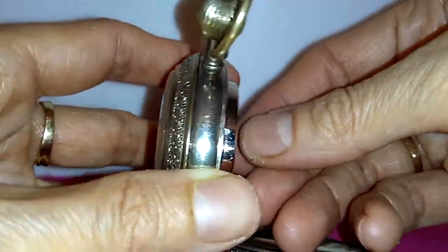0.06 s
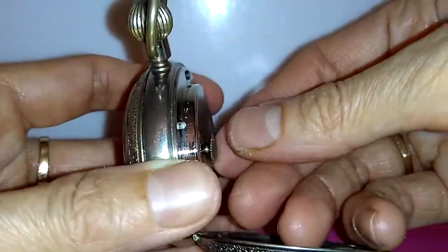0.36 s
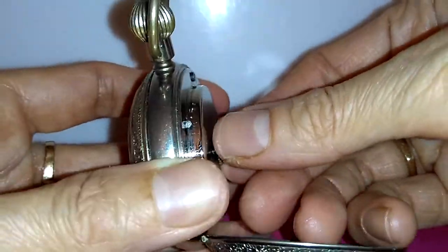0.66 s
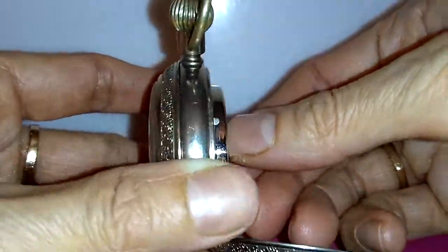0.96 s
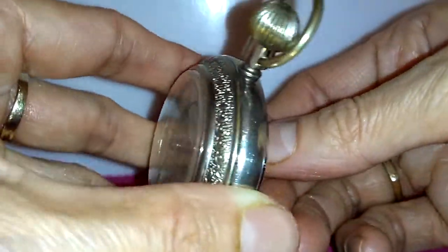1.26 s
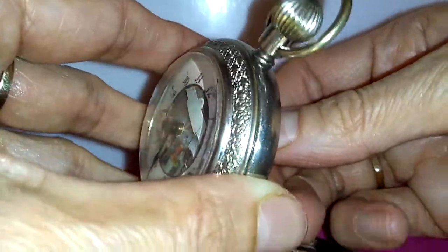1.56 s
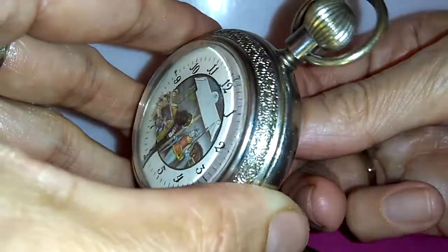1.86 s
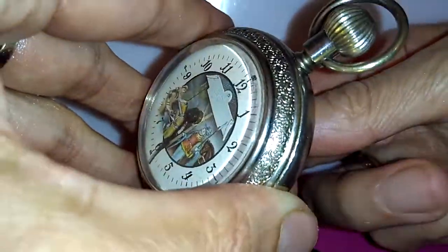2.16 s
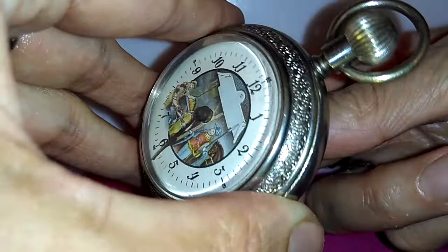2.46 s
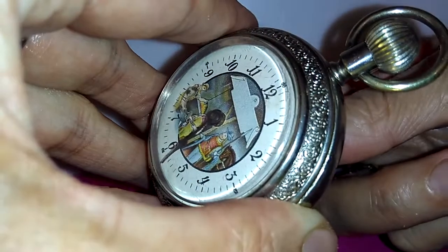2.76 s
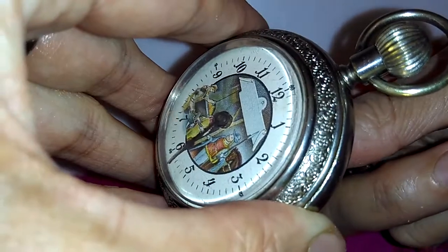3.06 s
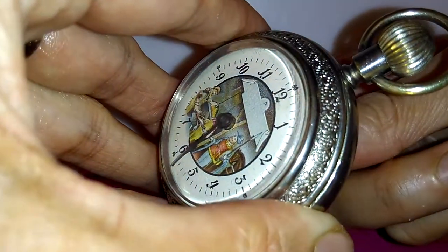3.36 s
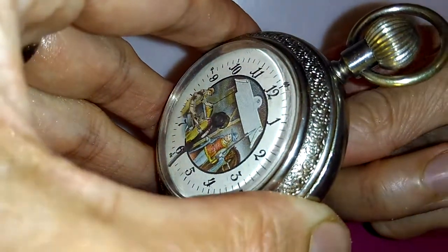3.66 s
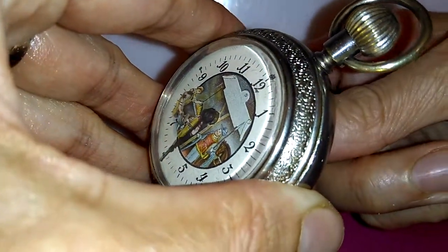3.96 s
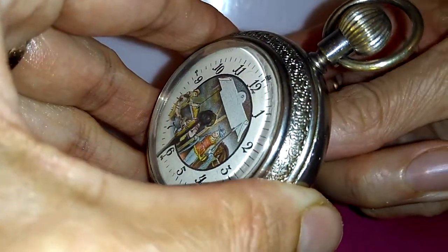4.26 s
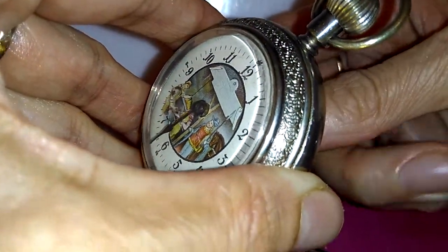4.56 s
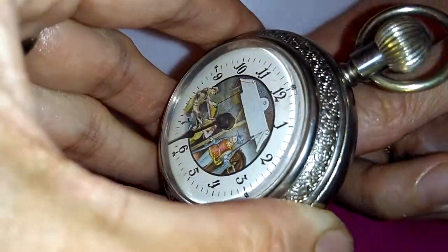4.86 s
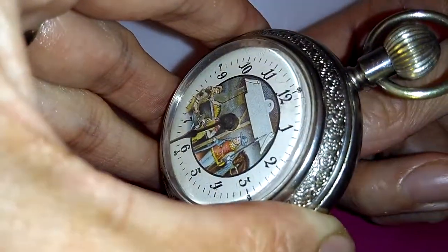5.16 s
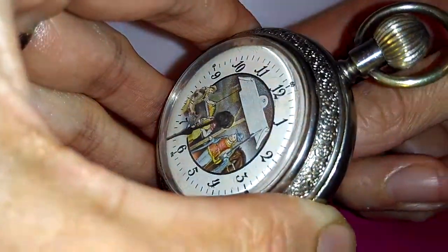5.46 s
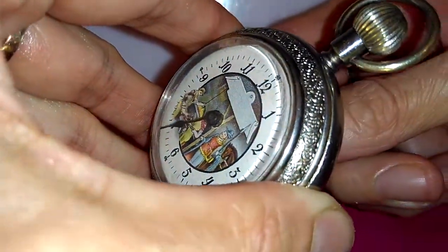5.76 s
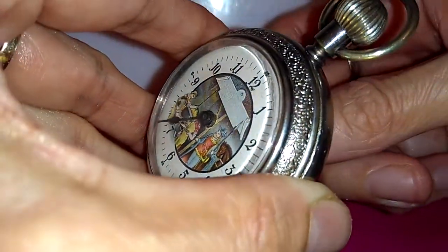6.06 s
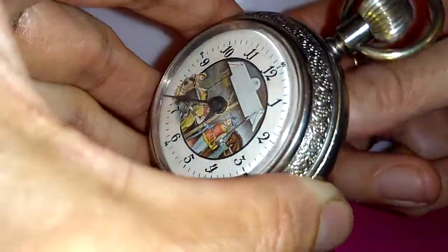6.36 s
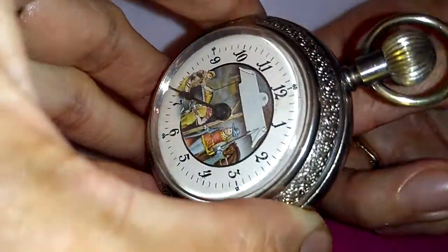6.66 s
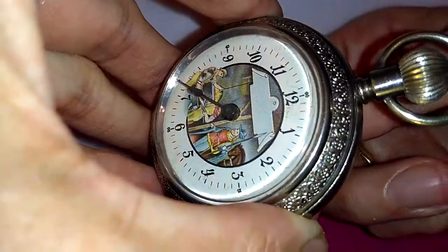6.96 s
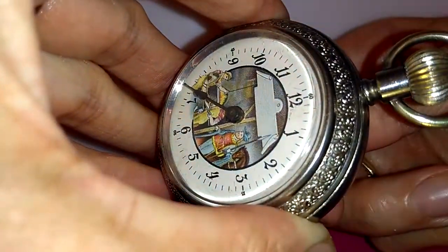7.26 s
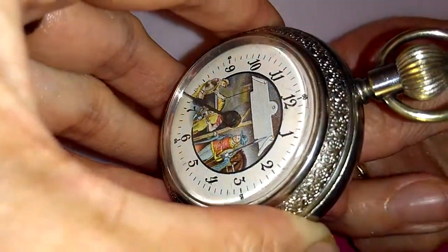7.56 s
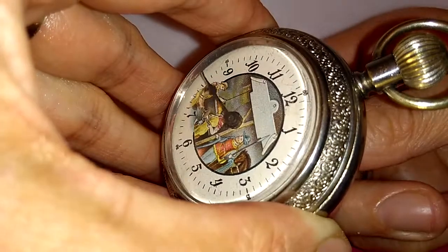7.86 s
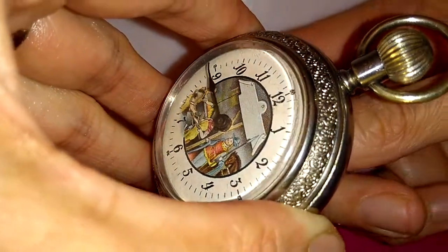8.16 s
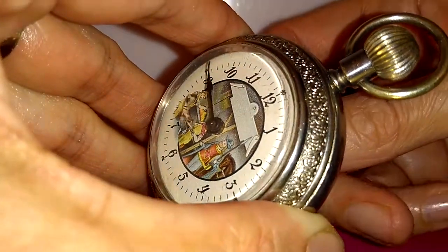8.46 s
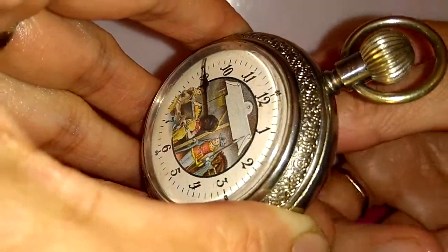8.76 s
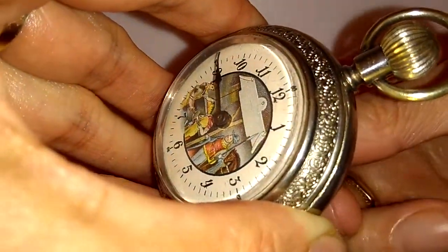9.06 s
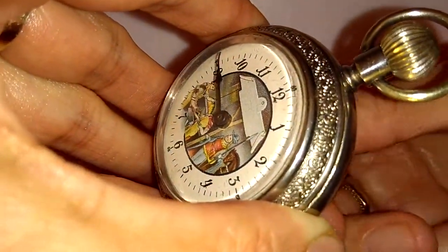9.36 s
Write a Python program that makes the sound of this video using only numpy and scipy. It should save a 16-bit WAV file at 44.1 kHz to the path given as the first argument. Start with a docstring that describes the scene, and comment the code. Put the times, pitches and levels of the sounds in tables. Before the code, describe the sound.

In a small quiet room, a pocket watch keeps up a fast, even, light ticking very near the microphone. As it is turned in the hands, fingers knock dully on the case and rub softly over it, and the metal gives a few sharp little clicks, most clearly around four seconds in. The ticking never pauses, and a steady low rumble with faint hum and hiss lies behind it.

```python
"""In a quiet small room, a pocket watch held close beats five times a second: firm tick, softer tock.
Each beat is a faint unlocking click, then a toothed wheel drops onto a catch and rattles, which
makes the works and the case ring. Fingers turn the watch with dull knocks, sharp little clicks and
a soft rub of skin. Behind it are low rumble, hum, hiss and a brief, faint whistle."""
import sys
import numpy as np
from scipy import signal
from scipy.fft import rfft, irfft, next_fast_len
from scipy.io import wavfile

SR = 44100
rng = np.random.default_rng(int(sys.argv[2]) if len(sys.argv) > 2 else 0)


def digitize_waveform(pressure):
    """Quantize a signal to 16-bit integers and store it at the path in sys.argv[1].

    Rows of a 2-D input are taken as channels; values are limited to [-1, 1].
    """
    field = np.atleast_2d(pressure).T
    bounded = np.clip(field, -1, 1)
    quanta = np.round(bounded * 32767).astype(np.int16)
    wavfile.write(sys.argv[1], SR, quanta)


N = 415414
SHORT = SR // 10  # samples in which one contact dies away
TIME, AGE = np.arange(N) / SR, np.arange(SHORT) / SR  # seconds into the scene, and into one contact

# The notes (modes) each part rings with; a narrow one rings longer: (pitch [Hz], width [Hz], level [dB])
CASE_MODES = [(1170, 220, -7), (1340, 105, 8)]
PLATE_MODES = [(1902, 350, -8.5), (2690, 81, 13), (3532, 400, 6.5), (4526, 314, 3), (5440, 326, 5.5),
               (6620, 230, 3), (7030, 300, 0), (7930, 520, -1.5)]  # the plates that hold the wheels
SPRING_MODES = [(5650, 280, 2.5), (6112, 113, 6.7)]
STEEL_MODES = [(8170, 1350, -7.5), (9640, 1330, -4), (11020, 880, -7), (11550, 110, -1), (12270, 670, 1),
               (13400, 1300, -3), (14680, 1200, -2)]  # the small steel parts
AFTERRING_MODES = [(3725, 18, -6), (8899, 18, -7), (9197, 18, -4), (11400, 35, -14), (11623, 35, -14),
                   (12700, 25, -14)]  # thin notes of the works that linger after each drop
HAIRSPRING_MODES = [(5746, 27, 0)]  # the ping of the finest spring
HELD_CASE_MODES = [(642, 195, 7.5), (1230, 300, -1), (1518, 94, -0.5), (3070, 220, -8.5)]  # the case when a finger knocks it
BOW_MODES = [(1910, 1800, 2), (3980, 340, 9), (5250, 750, 2), (8300, 840, 8), (10000, 2100, 2.5),
             (13500, 1600, 0)]  # the bow is the loop for the chain
# Drops of the wheel, tick and tock in turn; no two teeth land equally hard, and the grip tunes the case:
# (time [s], case [dB], plates [dB], spring [dB], steel [dB], hairspring [dB], case pitch [Hz])
BEATS = [(0.0455, -44.5, -40, -57, -36, -70.0, 1180.0), (0.2512, -63, -46.5, -61, -39.5, -59, 1230.0),
         (0.446, -55, -41.5, -68, -38, -57, 1180.0), (0.6529, -55.5, -51, -55, -35.5, -68, 1240),
         (0.8478, -46, -40, -47.0, -33.5, -61, 1200.0), (1.0522, -43.5, -43, -66, -40.0, -70.0, 1224),
         (1.2484, -52, -40, -47, -39.0, -69, 1290), (1.453, -46.5, -39.0, -61, -39, -56, 1350.0),
         (1.65, -49, -40, -47.5, -39.5, -42, 1300), (1.8544, -59, -38, -60, -40, -73, 1400.0),
         (2.0493, -47.5, -38.0, -49, -38.5, -51, 1330.0),
         (2.2545, -50.5, -42.5, -50.5, -38.5, -69.5, 1340.0), (2.4504, -45, -40, -50.5, -38, -61, 1360),
         (2.6568, -52.5, -41.5, -64, -40.5, -70.0, 1410), (2.8515, -45.5, -39, -46, -35, -49, 1360),
         (3.0565, -45.5, -39.5, -51, -38, -66.0, 1320), (3.2527, -44, -43, -56, -36.5, -54, 1230.0),
         (3.4564, -48.5, -39.5, -49, -38.5, -66.0, 1280), (3.6524, -43, -38.5, -45, -36, -64, 1300),
         (3.857, -50, -46.5, -49, -39, -70.0, 1340), (4.0528, -44, -37, -47, -35, -54, 1250),
         (4.259, -48.5, -42.5, -51, -39, -68, 1300.0), (4.4535, -46.5, -38.5, -45, -36.5, -61, 1300),
         (4.6596, -50.0, -42.5, -54, -41.0, -69.5, 1390), (4.855, -44, -37.5, -42.5, -37.5, -52.0, 1380),
         (5.0605, -49, -44.5, -46, -40.5, -54, 1430), (5.2553, -43.5, -40, -44.5, -37, -49, 1350),
         (5.4597, -49.5, -42, -49, -36.5, -70.0, 1400), (5.6559, -42, -41.5, -39.5, -37.0, -61.0, 1260.0),
         (5.8602, -53.0, -43.5, -42.5, -38.5, -60, 1320), (6.0564, -47, -37.5, -41.5, -35, -61.5, 1300),
         (6.2615, -51.5, -42.5, -46, -38.5, -47, 1340), (6.4574, -45.5, -40.0, -46.5, -41, -65.0, 1370.0),
         (6.662, -51.5, -40.5, -43.5, -41, -61.0, 1420), (6.8586, -44.5, -40.5, -36.5, -40, -42.5, 1300),
         (7.0619, -48, -42, -43.5, -41.5, -67, 1360.0), (7.2588, -46, -40, -47, -41, -51, 1360.0),
         (7.462, -48, -40.5, -45.5, -37.5, -65.5, 1410), (7.6595, -42, -41.5, -41.5, -36.5, -63, 1270.0),
         (7.8627, -48.5, -45, -52.0, -40, -70.0, 1400), (8.0596, -46.5, -38, -40.5, -35.5, -59.0, 1320),
         (8.2633, -49.5, -44.5, -44.5, -41, -73, 1340.0), (8.4605, -41, -37.5, -38, -36, -53.0, 1365),
         (8.6656, -46.5, -43.5, -55, -40, -70.0, 1430), (8.8612, -46, -40.5, -42.0, -38, -56, 1344),
         (9.065, -44.0, -41, -60, -40, -70.0, 1355), (9.262, -48, -40, -44.5, -39.0, -54, 1340)]
# Dull knocks; a firm grip lowers the pitch: (time [s], peak [dB], contact length [s], pitch [factor])
KNOCKS = [(0.047, -30.5, 0.0013, 0.6), (0.9517, -21.5, 0.0013, 1.14), (1.025, -31, 0.00089, 1.15),
          (1.0285, -44, 0.0013, 1), (2.3395, -36.5, 0.002, 0.85), (2.559, -38, 0.00071, 2.07),
          (2.8574, -31.5, 0.0012, 0.59), (3.9575, -27.5, 0.0017, 1.53), (3.985, -30.5, 0.0018, 1.62),
          (4.031, -39, 0.0039, 1.84), (4.142, -46, .002, 1.9), (9.3253, -28, 0.003, 1.143),
          (9.335, -33, 0.0022, 1)]
# Clicks at the bow and rim: (time [s], peak before the bass cut [dB], contact length [s], bass cut [Hz])
CLICKS = [(2.561, -31.5, 0.0026, 1000), (3.9246, -18.5, 0.0016, 7100), (3.9402, -26, 0.0022, 3000),
          (3.958, -19, 0.0024, 800), (3.987, -31, 0.0026, 2000), (3.9925, -32, .003, 5000),
          (4.536, -36, .001, 3000), (5.2815, -28, .0014, 4000), (6.5215, -30.5, .0011, 1000)]
# Swells of rubbing: (middle [s], length [s], level [dB])
SKIN_RUBS = [(1.13, 0.31, -66), (1.77, 0.57, -63), (3.98, 0.08, -71), (6.6, .25, -71), (7.8, 0.092, -66),
             (8.58, 0.19, -68)]
GRIP_SHIFTS = [(.4, 0.46, -61.5), (1.25, 0.82, -60.5), (2.9, 0.74, -64.5), (3.99, 0.042, -71),
               (4.8, 0.12, -59.5), (6.33, .08, -59), (6.55, 0.15, -56.5), (8.56, 0.12, -63)]
BOW_GRATES = [(3.985, 0.079, -55)]
# Tone of the room's echo: (frequency [Hz], level [dB])
ECHO_COLOUR = [(300, -1.5), (800, -1), (1400, -10), (2000, 3), (2700, -9.5), (3700, -10.5), (4700, -5.5),
               (6000, -14), (8500, -7.5), (10500, -14), (12500, -18), (15000, -17), (15700, -46)]
# Faint airy whistles: (middle [s], length [s], pitch [Hz], level [dB])
WHISTLES = [(6.988, 0.13, 820, -53.5), (7.132, 0.08, 846, -59)]
# Tone of the room's rumble and hiss: (frequency [Hz], level [dB])
NOISE_COLOUR = [(25, -66), (38, -45), (62, -32.5), (90, -33), (130, -26), (200, -33), (300, -35.5),
                (600, -42.5), (1300, -50.5), (2200, -53.5), (3300, -55.5), (5500, -65), (12500, -66.5),
                (15100, -67), (15900, -90)]
# A low hum and a thin high hiss: (pitch [Hz], width [Hz], level [dB], left-right likeness [-1 to 1])
DRONES = [(121.5, 3.3, -60, -0.42), (8445, 140, -69, 0.57)]
# A higher hum that comes and goes: (time [s], level [dB])
HUM_LEVELS = [(0, -68), (1.4, -68.5), (1.7, -58.5), (5.2, -58.5), (5.5, -75), (6.4, -58), (6.8, -59),
              (9.4, -61.5)]
# Sound from all round, at two microphones: (frequency [Hz], how related [0 to 1], left over right [dB])
ALL_ROUND = [(60, 1, -3.5), (200, 0.76, -1.5), (510, 0.4, -1), (1100, 1, -1.5), (5200, 1, -0.4),
             (6700, 0.97, -6), (10400, 1, -5), (14700, 0.2, -5)]

# A tick and a tock: (unlock ahead of drop [s], base unlock level [dB], slide relative to unlock [dB])
TICK, TOCK = (0.0116, -12.5, -2.5), (0.012, -11, -5)
PIN_LEAD_S, PIN_DB = 0.013, -60  # before the unlock, a pin brushes the forked lever that holds the catch
REBOUND_S, REBOUND_DB = 0.0085, -19.5  # the wheel bounces once more; level relative to the steel
AFTERRING_DB = -21  # also relative to the steel
CASE_LATE_S = 0.00093  # the heavy case answers a little late
MIC_SPACING_S, WATCH_LAG_S = 0.000408, 0.00039  # travel time between microphones; watch's lag on right


def escapement():
    """The ticking: a wheel stops tooth by tooth. Light steel rings at once, heavier parts build up."""
    out = np.zeros((2, N))
    one_blow = np.array([AGE == 0, np.zeros(SHORT)])
    bright_modes = PLATE_MODES[2:] + STEEL_MODES
    for k, (s, case_db, plates_db, spring_db, steel_db, ping_db, case_hz) in enumerate(BEATS):
        lead_s, unlock_db, slide_db = TOCK if k % 2 else TICK
        unlock_s = s - lead_s
        pin = strike(bright_modes, chatter(0.00086, 0.0015, first=0.2))
        add(out, unlock_s - PIN_LEAD_S, at_level(pin, PIN_DB))
        steel = beat(lead_s, STEEL_MODES, steel_db, unlock_db - 3.5, slide_db=-8,
                     length_s=0.0017, rise_s=0.00024, first=0.54)
        spring = beat(lead_s, SPRING_MODES, spring_db, unlock_db - 3, slide_db,
                      length_s=0.0019, rise_s=0.00032, first=0.17)
        plates = beat(lead_s, PLATE_MODES, plates_db, unlock_db - 4, slide_db,
                      length_s=0.0013, rise_s=0.0023, first=0.25, pitch=1 + rng.normal(0, 0.022))
        add(out, unlock_s, steel + spring + plates)
        case = beat(lead_s, CASE_MODES, case_db, unlock_db, slide_db,
                    length_s=0.00085, rise_s=0.00056, first=2.4, pitch=case_hz / CASE_MODES[1][0])
        add(out, unlock_s + CASE_LATE_S, case)
        rebound = strike(bright_modes, chatter(0.001, 0.0008, first=0.3))
        add(out, s + REBOUND_S, at_level(rebound, steel_db + REBOUND_DB))
        afterring = at_level(strike(AFTERRING_MODES, one_blow), steel_db + AFTERRING_DB)
        ping = at_level(strike(HAIRSPRING_MODES, one_blow), ping_db)
        add(out, s, afterring + ping)
    return out


def beat(lead_s, modes, db, unlock_db, slide_db, length_s, rise_s, first, pitch=1):
    """One part's share of a beat: the catch unlocks, a tooth slides over it, the wheel drops."""
    unlock = strike(modes, chatter(0.0012, 0.0012, first=0.3), pitch)
    sound = at_level(unlock, db + unlock_db + rng.normal(0, 1.5))
    slide = strike(modes, chatter(0.0064, 0.012, first=0), pitch)
    sound += at_level(slide, db + unlock_db + slide_db)
    drop = strike(modes, chatter(length_s * rng.uniform(1.0, 1.04), rise_s, first), pitch)
    add(sound, lead_s, at_level(drop, db))
    return sound


def chatter(length_s, rise_s, first):
    """Two unrelated rattles of tiny dying bounces, each led by a hit `first` times as strong."""
    bounces = rng.standard_normal((2, SHORT)) * (rng.random((2, SHORT)) < 0.3)
    rise = 1 - np.exp(-AGE / rise_s)
    fade = np.exp(-(AGE / length_s) ** 0.72)
    drive = unit_power(bounces * rise * fade) / np.sqrt(SHORT)
    drive[:, 0] = first * rng.choice([-1, 1], 2)
    return drive / np.hypot(1, first)


def strike(modes, drive, pitch=1):
    """A hit rings all the notes of a part, each a little louder or softer by chance."""
    scatter_db = rng.normal(0, 2.3, len(modes))
    pair = sum((-1) ** k * from_db(db + scatter_db[k]) * resonate(drive, hz * pitch, width)
               for k, (hz, width, db) in enumerate(modes))
    return spread(pair, likeness=0.87)


def handling():
    """Padded fingers knock the case and bare metal clicks; a glancing click has no low notes."""
    out = np.zeros((2, N))
    for s, db, length_s, pitch in KNOCKS:
        add(out, s, contact(HELD_CASE_MODES, db, length_s, first=1.7, treble_hz=3040, pitch=pitch))
    for s, db, length_s, lowest_hz in CLICKS:
        click = contact(BOW_MODES, db, length_s, first=3.4, treble_hz=14800)
        add(out, s, filtered(click, lowest_hz, "highpass"))
    return out


def contact(modes, db, length_s, first, treble_hz, pitch=1):
    """A tap on a held part: the shorter, the more its first hit stands out; the softer, the duller."""
    rattle = chatter(length_s, rise_s=0.0026, first=first * 0.0012 / length_s)
    sound = strike(modes, filtered(rattle, treble_hz, "lowpass"), pitch)
    return from_db(db) * sound / np.abs(sound).max()


def thumb_bump(s, db, hz, width_hz):
    """The thumb pressing on the case gives one soft low thud."""
    out = np.zeros((2, N))
    thud = resonate(1.0 * (AGE == 0), hz, width_hz)
    add(out, s, from_db(db) * np.array([thud, thud]) / np.abs(thud).max())
    return out


def rubbing(slips_per_s=1800):
    """Skin slips over metal in bright grains, finger pads shuffle dully, the bow grates in its seat."""
    grains = rng.standard_normal((2, N)) * from_db(3.3 * np.minimum(rng.exponential(1, N), 5))
    skin = unit_power(resonate(grains, hz=9700, width_hz=8500))
    low_noise = resonate(rng.standard_normal((2, N)), hz=460, width_hz=570)
    pads = unit_power(resonate(low_noise, hz=460, width_hz=570))
    slips = grains * (rng.random(N) < slips_per_s / SR)
    grate = unit_power(strike(HELD_CASE_MODES[1:], slips))
    return swells(SKIN_RUBS) * skin + swells(GRIP_SHIFTS) * pads + swells(BOW_GRATES) * grate


def room_echo(sound, fade_s=0.44):
    """The walls throw sound back; the hands keep moving, so each beat gets a new pattern of echoes."""
    out, age = np.zeros((2, N)), np.arange(SR // 2) / SR
    shape = from_db(-60 * age / fade_s) * (1 - np.exp(-age / 0.00039))
    edges = [0] + [round(s * SR) - SHORT // 2 for s, *_ in BEATS[1:]] + [N]
    for start, end in zip(edges, edges[1:]):
        tail = unit_power(rng.standard_normal((2, len(age))) * shape)
        tail = from_all_round(tail, ECHO_COLOUR) / np.sqrt(len(age))
        add(out, start / SR, signal.fftconvolve(sound[:1, start:end], tail[:, :SR * 2 // 5], axes=1))
    return out


def whistle(waver_hz=54.3):
    """An airy, wavering note swells and fades, then comes once more a little higher."""
    waver = filtered(rng.standard_normal((2, N)), waver_hz, "lowpass")
    out = np.zeros(N)
    for s, length_s, hz, db in WHISTLES:
        phase = 2 * np.pi * hz * TIME
        note = unit_power(waver[0] * np.sin(phase) + waver[1] * np.cos(phase))
        out += swells([(s, length_s, db)]) * note
    return out


def background():
    """The room's steady rumble, hiss and drones, plus a hum that comes and goes."""
    noise = from_all_round(rng.standard_normal((2, next_fast_len(N))), NOISE_COLOUR)[:, :N]
    for hz, width_hz, db, likeness in DRONES:
        noise += from_db(db) * drone(hz, width_hz, likeness)
    hum_gain = from_db(np.interp(TIME, *np.transpose(HUM_LEVELS)))
    return noise + hum_gain * drone(hz=218.8, width_hz=7.7, likeness=0.37)


def drone(hz, width_hz, likeness):
    """Noise in a band so narrow that it has a pitch."""
    return unit_power(spread(resonate(rng.standard_normal((2, N)), hz, width_hz), likeness))


def from_all_round(pair, colour):
    """Sound from every side: two spaced microphones oppose and agree in turn as the pitch rises."""
    size = pair.shape[1]
    db, = over_hz(colour, size)
    related, balance_db = over_hz(ALL_ROUND, size)
    hz = np.arange(len(db)) * SR / size
    likeness = -np.clip(related, 0, 0.98) * np.cos(2 * np.pi * hz * MIC_SPACING_S)
    gain = from_db(db + balance_db * np.array([[0.5], [-0.5]]))
    return irfft(spread(rfft(pair), likeness) * gain, size)


def at_microphones(sound):
    """The watch is nearer the left microphone; the right one gets the wave later and upside down."""
    right = -np.roll(sound[1], round(WATCH_LAG_S * SR))
    return np.array([sound[0], right]) * from_db([[-0.3], [0.3]])


def resonate(x, hz, width_hz):
    """Let a signal ring at one pitch, which passes at full strength."""
    r = np.exp(-np.pi * width_hz / SR)  # share of the ring left after each sample
    feedback = [1, -2 * r * np.cos(2 * np.pi * hz / SR), r * r]
    return signal.lfilter(np.array([1, 0, -1]) * (1 - r * r) / 2, feedback, x + 1e-18)


def filtered(x, hz, kind):
    """Gently cut the sound above hz (lowpass) or below it (highpass)."""
    return signal.sosfilt(signal.butter(2, hz, kind, fs=SR, output="sos"), x)


def spread(pair, likeness):
    """Turn two unrelated signals into left and right: likeness 1 is the same, -1 is opposite."""
    mid = np.sqrt((1 + likeness) / 2) * pair[0]
    side = np.sqrt((1 - likeness) / 2) * pair[1]
    return np.array([mid + side, mid - side])


def swells(rows):
    """A volume curve of smooth humps; each length is taken at half height."""
    return sum(from_db(db) * np.exp2(-np.minimum((2 * (TIME - s) / length_s) ** 2, 20))
               for s, length_s, db in rows)


def over_hz(table, size):
    """Fill in a table's columns at every frequency of a signal of this size."""
    hz, *columns = np.transpose(table)
    bins = np.maximum(np.arange(size // 2 + 1) * SR / size, 1)
    return [np.interp(np.log(bins), np.log(hz), column) for column in columns]


def at_level(sound, db):
    """Scale a sound so that its first 10 ms have this level."""
    return sound * from_db(db) / np.sqrt(np.mean(sound[:, :SR // 100] ** 2))


def unit_power(x):
    """Scale to an average power of 1."""
    return x / np.sqrt(np.mean(x ** 2) + 1e-20)


def from_db(db):
    """Turn decibels into a volume factor."""
    return 10 ** (np.asarray(db) / 20)


def add(track, s, sound):
    """Mix a short stereo sound in at s seconds."""
    start = max(round(s * SR), 0)
    track[:, start:start + sound.shape[1]] += sound[:, :max(track.shape[1] - start, 0)]


def scene():
    """The watch and the hands, close up, in the room."""
    watch = escapement() + rubbing()
    knocks = handling()
    echo = room_echo(watch + from_db(-4) * knocks)  # the hands shield their knocks from the room
    thud = thumb_bump(s=KNOCKS[0][0], db=-35, hz=180, width_hz=33)
    return at_microphones(watch + knocks) + echo + thud + whistle() + background()


def record(dry):
    """Cut the treble steeply above 15500 Hz."""
    return signal.sosfilt(signal.ellip(8, 0.2, 80, 15500, fs=SR, output="sos"), dry)


dry = scene()
out = record(dry)
digitize_waveform(out)
```